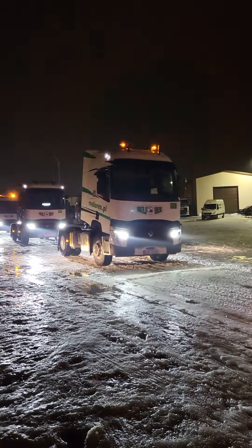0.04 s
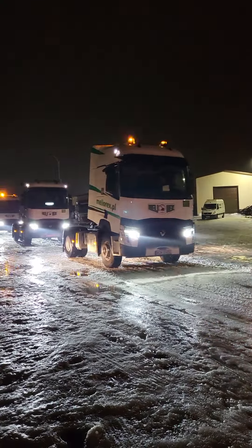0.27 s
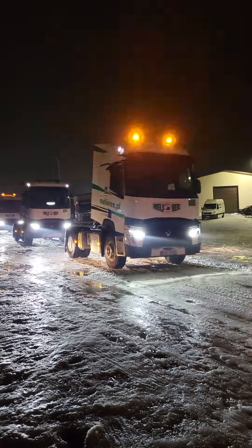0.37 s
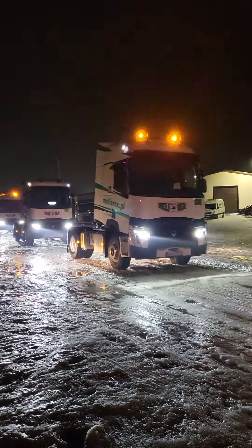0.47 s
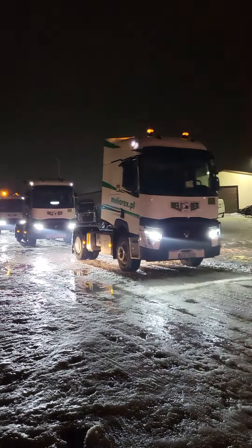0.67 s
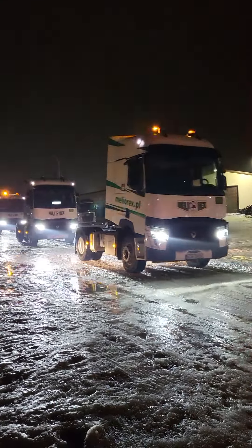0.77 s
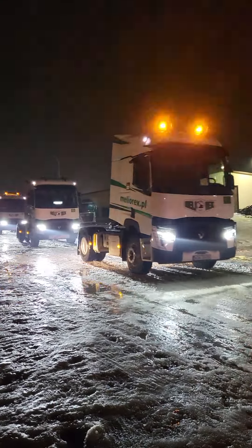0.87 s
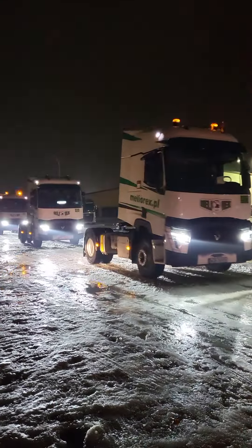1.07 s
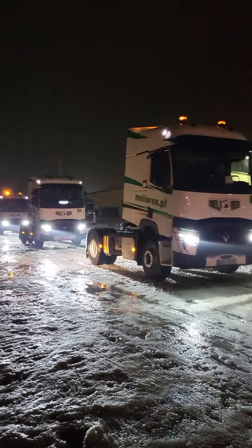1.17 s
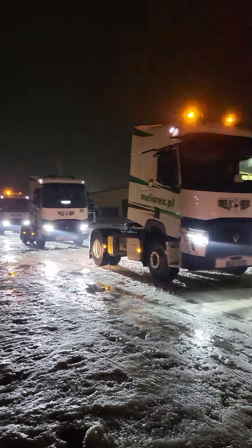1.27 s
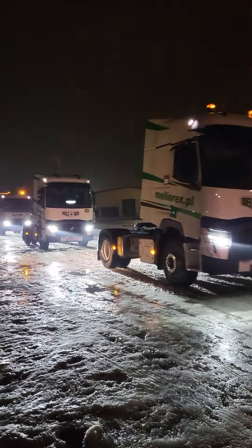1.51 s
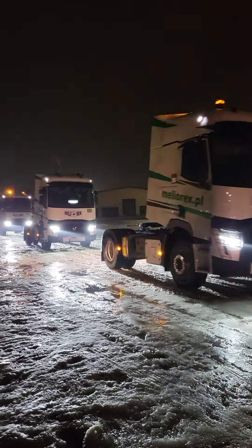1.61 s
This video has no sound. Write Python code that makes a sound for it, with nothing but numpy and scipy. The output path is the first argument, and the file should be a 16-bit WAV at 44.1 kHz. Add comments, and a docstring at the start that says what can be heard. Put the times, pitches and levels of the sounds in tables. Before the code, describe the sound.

A truck horn gives three short toots over clattering diesel engines in an open yard.

```python
"""Diesel engines clatter and rumble in an open, slushy yard, with a light hiss of tyres and air.
A truck gives three short toots: its horn's diaphragm buzzes through a flared bell, with a faint rasp.
Trucks and walls around the yard throw back dull echoes, and the engines carry on underneath.
Heard on a stereo pair of microphones; soft bumps of air reach mostly the right one."""
import sys
import numpy as np
from scipy import signal
from scipy.io import wavfile

SR = 44100
rng = np.random.default_rng(int(sys.argv[2]) if len(sys.argv) > 2 else 0)


def int16_out(signal):
    """Quantize to a 16-bit WAV file."""
    q = np.round(np.clip(np.atleast_2d(signal).T, -1, 1) * 32767)
    wavfile.write(sys.argv[1], SR, q.astype(np.int16))


N = 72765
T = np.arange(N) / SR
TREBLE_RELEASE_S = .014  # shared by the horn's high partials and its rasp


def from_db(db):
    """Decibels to gain."""
    return 10 ** (np.asarray(db) / 20)


def rms_one(x):
    """Scale to unit rms."""
    return x / np.sqrt(np.mean(x ** 2) + 1e-20)


def pan(db):
    """Equal-power gains for a left-minus-right level difference."""
    return rms_one(from_db(np.array([[db], [-db]]) / 2))


def in_time(rows):
    """Join (time, value) points by straight lines."""
    return np.interp(T, *np.transpose(rows))


def at_hz(points, hz):
    """Read a spectrum on a log-frequency axis."""
    freqs, values = np.transpose(points)
    return np.interp(np.log(hz), np.log(freqs), values)


def near(hz, centre_hz, width_octaves=.34):
    """A bell-shaped weight around a frequency."""
    return np.exp(-(np.log2(hz / centre_hz) / width_octaves) ** 2)


def drift(rate_hz):
    """Smooth random wander of spread 1."""
    pole = np.exp(-80 * np.pi * rate_hz / SR)
    steps = rng.standard_normal(N // 40 + 2002)  # one every 40 samples
    slow = signal.lfilter([1], [1, -2 * pole, pole * pole], steps)[2000:]
    return np.interp(np.arange(N) / 40, np.arange(len(slow)), rms_one(slow))


def dull(x, hz):
    """Second-order low-pass."""
    return signal.sosfilt(signal.butter(2, hz, fs=SR, output="sos"), x + 1e-18)


def banded_noise(spectrum, flicker_db, left_lag_s=.00008):
    """Unit-rms stereo noise in flickering third octaves, reaching the left microphone a little late."""
    # how alike the two microphones hear it: frequency_hz, correlation
    likeness = [(50, .1), (150, 0.1), (300, 0.41), (650, 0.85), (1400, 0.66), (3000, 0.092), (6500, 0.37),
                (15000, 0.065)]
    edges = 22 * 2 ** (np.arange(30) / 3)
    white = rng.standard_normal((2, 2, N))
    out = 0
    for k, (low, high) in enumerate(zip(edges, edges[1:])):
        hz, flicker = np.sqrt(low * high), drift(36)
        if high < spectrum[0][0] or low > spectrum[-1][0]:
            continue
        band = signal.butter(2, [low, high], "band", fs=SR, output="sos")
        mid, side = signal.sosfilt(band, white[k % 2])
        alike = at_hz(likeness, hz)
        stereo = np.sqrt(1 + alike) * mid + np.sqrt(1 - alike) * side * [[1], [-1]]
        out = out + from_db(at_hz(spectrum, hz) + flicker_db * flicker) * stereo
    return rms_one(np.array([np.roll(out[0], round(left_lag_s * SR)), out[1]]))


def rumble(bump_s=.013):
    """Low engine rumble and soft bumps of air, mostly on the right microphone."""
    # rumble spectrum: frequency_hz, relative_density_db
    spectrum = [(25, -12), (45, -3.5), (85, 0), (130, -4.5), (220, -16), (350, -32)]
    # rumble loudness: time_s, level_db
    levels = [(0, -41.5), (.22, -37.5), (.4, -46), (.6, -43.5), (.82, -48), (.98, -48.5), (1.2, -50),
              (1.65, -50.5)]
    # air bumping the microphone: peak_s, level_db
    bumps = [(.05, -46), (0.212, -38), (.32, -52), (.56, -43), (1.05, -47)]
    air = sum(from_db(db) * np.exp(-((T - peak_s) / bump_s) ** 2) for peak_s, db in bumps)
    return pan(-13) * (from_db(in_time(levels)) + air) * banded_noise(spectrum, flicker_db=4)


def engines(firings_per_s=31, clatter_depth=.1):
    """Diesel clatter near the centre, throbbing with the firings."""
    # clatter, with tyre and air hiss on top: frequency_hz, relative_density_db
    spectrum = [(180, -11), (250, -10), (330, -2), (440, 1.5), (530, -2.5), (660, -1), (950, -3.5),
                (1100, -7.5), (1400, -6.5), (2200, -13), (2900, -12), (4000, -21), (5500, -20), (8000, -28),
                (13000, -30.5), (16000, -29.5)]
    # engine loudness: time_s, level_db
    levels = [(0, -29), (.1, -27.5), (.24, -25.5), (.4, -24.5), (.6, -28), (.82, -31.5), (1.05, -33),
              (1.3, -33), (1.65, -32.5)]
    firings = np.cumsum(firings_per_s * (1 + .069 * drift(9.4))) / SR
    throb = rms_one(np.exp(clatter_depth * (np.cos(2 * np.pi * firings) + .5 * drift(67))))
    return pan(-.5) * from_db(in_time(levels)) * throb * banded_noise(spectrum, flicker_db=2)


def yard(x, tail_db=-16, tail_t60_s=.35, tail_cut_hz=6000):
    """Trucks and walls, near and far, return dull echoes and a faint scattered tail."""
    # echo paths: delay_s, level_db, lowpass_hz
    paths = [(.023, -14.5, 5160), (.043, -16.5, 2100), (.225, -20, 1600)]
    echoes = sum(from_db(db) * np.array([np.interp(T - delay, T, side) for side in dull(x, hz)])
                 for delay, db, hz in paths)
    scatter = rng.standard_normal(N) + 1.8 * rng.standard_normal((2, N))
    response = rms_one(scatter * from_db(-60 * T / tail_t60_s)) / np.sqrt(N)
    tail = signal.fftconvolve(x, response, axes=1)[:, :N]
    return echoes + from_db(tail_db) * signal.lfilter(*signal.butter(1, tail_cut_hz, fs=SR), tail)


def envelope(start, end, release_s, attack_s=.013, sag_db_per_s=18.5):
    """Quick rise, sagging hold, exponential release."""
    rise = np.clip((T - start) / attack_s, 0, 1)
    sag = from_db(-sag_db_per_s * (T - (start + end) / 2))
    return rise * sag * np.exp(-np.maximum(T - end, 0) / release_s)


def air_rasp(toots, level_db=-33.3):
    """Air rasps faintly in the horn during each toot."""
    # rasp spectrum: frequency_hz, relative_density_db
    spectrum = [(700, -6), (1500, -7), (3000, -7), (4000, -9), (6000, -5), (8500, -16), (12500, -8),
                (16000, -13)]
    drive = sum(envelope(start, end, TREBLE_RELEASE_S) for start, end, *_ in toots)
    return from_db(level_db) * pan(-8) * drive * banded_noise(spectrum, flicker_db=1.5)


def kick(start, level_db, ring_hz=770, t60_s=.05):
    """The diaphragm's first pull rings the bell briefly."""
    age = np.maximum(T - start, 0)
    return from_db(level_db - 60 * age / t60_s) * np.sin(2 * np.pi * ring_hz * age)


def diaphragm(start, end, pitch_hz, settle_s=.00634):
    """Cycles swung and release (0 to 1): starts sharp, settles, goes sharp and wobbles when let go."""
    start_sharp_hz, release_sharp_hz, sag_hz_per_s = 12.2, 8.36, 8.7
    released = np.clip((T - end) / settle_s, 0, 1)
    held_hz = pitch_hz - sag_hz_per_s * (T - (start + end) / 2)
    sharp_hz = start_sharp_hz * np.exp(-np.maximum(T - start, 0) / settle_s) + release_sharp_hz * released
    wobble = 1 + .0007 * drift(120) + .012 * released * drift(70)
    cycles = np.cumsum((held_hz + sharp_hz) * wobble) / SR
    return cycles - cycles[int(start * SR)], released


def toot(start, end, level_db, pitch_hz, lift_hz, lift_db, dip_hz, dip_db, treble_db):
    """The diaphragm buzzes through the bell; its low partials build slowly and swell as it swings free."""
    # lowest partials, from the fundamental up: relative_level_db, left_minus_right_db
    partials = [(-24.5, 0.5), (-18.5, -1), (-19.5, 1.5), (-25, -3), (-24.5, -0.5), (-23.5, -2), (-21, -10),
                (-21.5, -5), (-23, -1.5), (-36.5, -4), (-35.5, -3), (-32.5, -2.5), (-37.5, -16), (-30, -3),
                (-27.5, -7), (-28.5, -1.5), (-37.5, -21), (-32.5, 0.5)]
    # overtones above those: frequency_hz, relative_level_db
    overtones = [(6900, -45.5), (7600, -44), (8600, -43.5), (9800, -49.5), (11000, -42.5), (13000, -40.5),
                 (14500, -47), (16000, -43)]
    # the horn's lag at the left microphone: frequency_hz, lag_rad
    left_lag = [(370, 0.54), (1100, 0.98), (3000, 1.02), (5000, 2.31), (13000, 2.02)]
    bass_lead_s, bass_build_s, bass_release_s, swell_db = .0018, .0087, .0085, 2
    flutter_db, flutter_hz, wander_rad = 2.68, 16.5, .35  # shifting reflections vary level and phase
    bell_spread = .16  # the bell smears each pulse: rad per partial number squared
    cycles, released = diaphragm(start, end, pitch_hz)
    out = 0
    for k in range(1, 44):
        hz = k * pitch_hz
        db, pan_db = partials[k - 1] if k <= len(partials) else (at_hz(overtones, hz), -3)
        treble = 1 / (1 + (1600 / hz) ** 4)
        bass = 1 - treble
        reflections_db = lift_db * near(hz, lift_hz) - dip_db * near(hz, dip_hz)
        colour_db = reflections_db * (1 - released) + swell_db * bass * released
        flutter = drift(flutter_hz) + treble * np.array([drift(flutter_hz), drift(flutter_hz)])
        gain = from_db(db + level_db + treble * treble_db + colour_db + flutter_db * flutter)
        coast_s = .045 / (1 + (hz / 990) ** 4)  # low partials sound on after the drive stops
        release_s = bass * bass_release_s + treble * TREBLE_RELEASE_S
        shape = envelope(start - bass_lead_s * bass, end + coast_s, release_s)
        shape *= 1 - bass * np.exp(-np.maximum(T - start, 0) / bass_build_s)
        phase = 2 * np.pi * k * cycles - bell_spread * k * k - np.array([[at_hz(left_lag, hz)], [0]])
        phase += wander_rad * treble * flutter[::-1]
        out = out + np.sqrt(2) * gain * pan(pan_db) * shape * np.cos(phase)
    return out


def horn():
    """The truck's three toots with their rasp; the first two open with a kick of the diaphragm."""
    # toots, each with a band that reflections lift and one they cancel:
    # start_s, end_s, level_db, pitch_hz, lift_hz, lift_db, dip_hz, dip_db, treble_db
    toots = [(.290, 0.385, -1, 365.1, 966, 8, 2370, 10.5, 0), (0.468, 0.527, -3, 366, 2110, 0, 820, 5, 0),
             (0.584, 0.726, -4.5, 365.4, 1410, 7, 1920, 12, 1.5)]
    # first pulls of the diaphragm: start_s, level_db
    kicks = [(.287, -10.5), (.466, -21)]
    rasp = air_rasp(toots)
    return sum(toot(*row) for row in toots) + sum(kick(*row) for row in kicks) + rasp


def scene():
    """The horn and its echoes across the yard, over engines and rumble."""
    toots = horn()
    return toots + yard(toots) + engines() + rumble()


def record(dry, cutoff_hz=15900):
    """The recorder rounds the highest peaks and cuts the top of the treble."""
    rounded = dry / (1 + dry ** 8) ** (1 / 8)
    return signal.sosfilt(signal.ellip(12, .1, 80, cutoff_hz, fs=SR, output="sos"), rounded)


dry = scene()
out = record(dry)
int16_out(out)
```